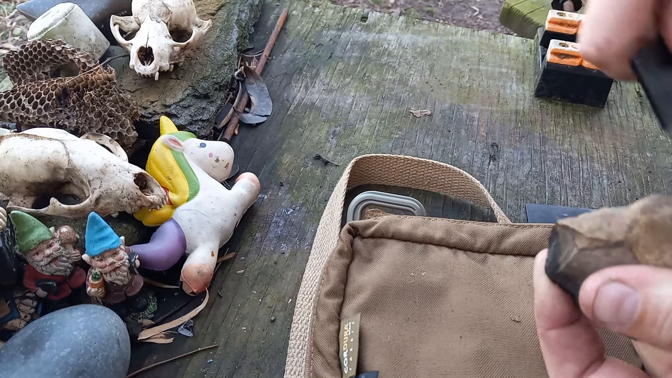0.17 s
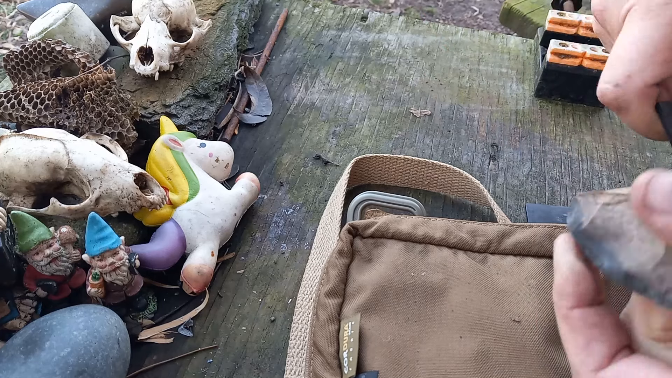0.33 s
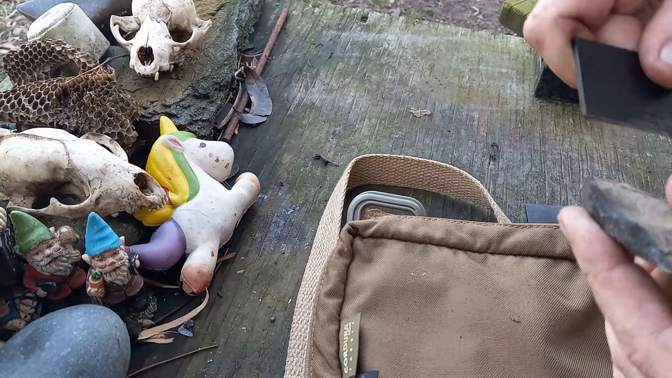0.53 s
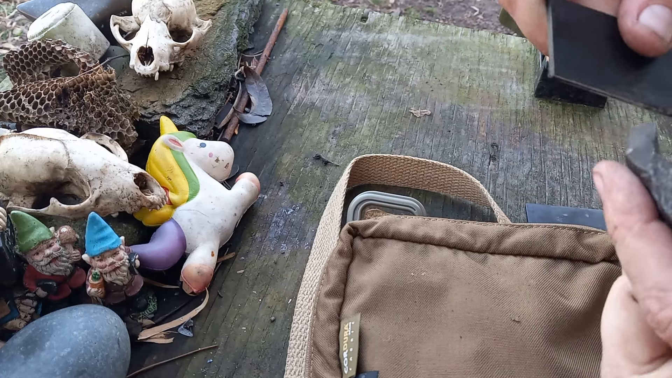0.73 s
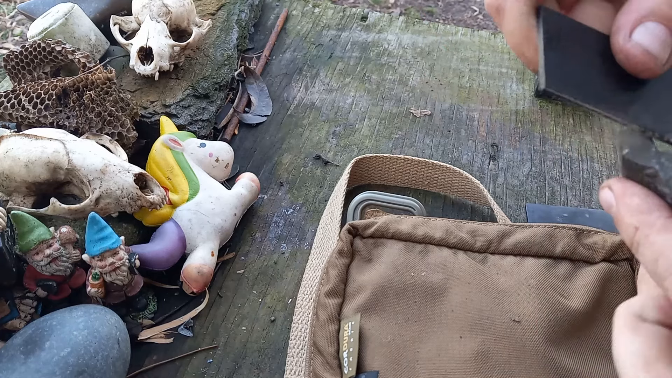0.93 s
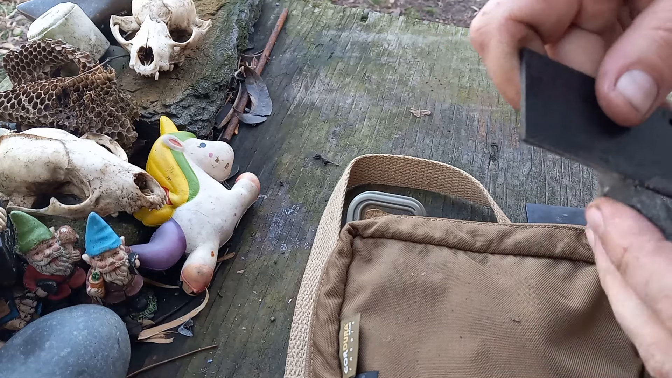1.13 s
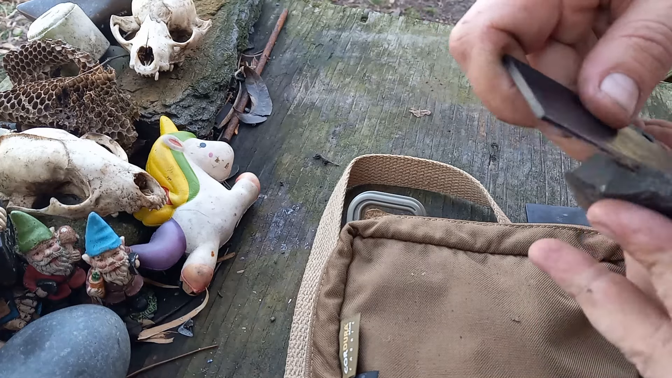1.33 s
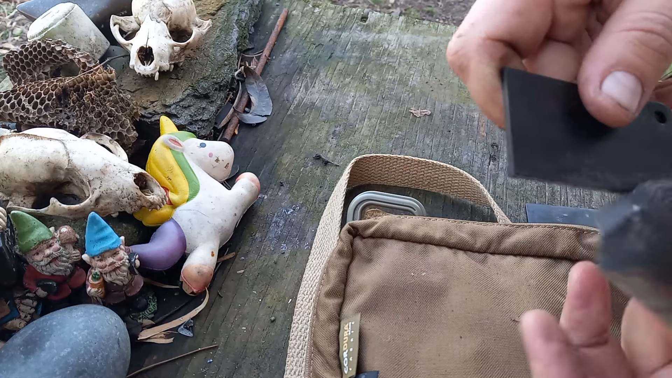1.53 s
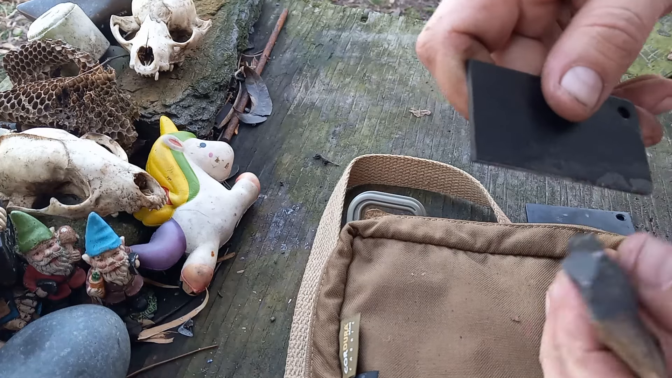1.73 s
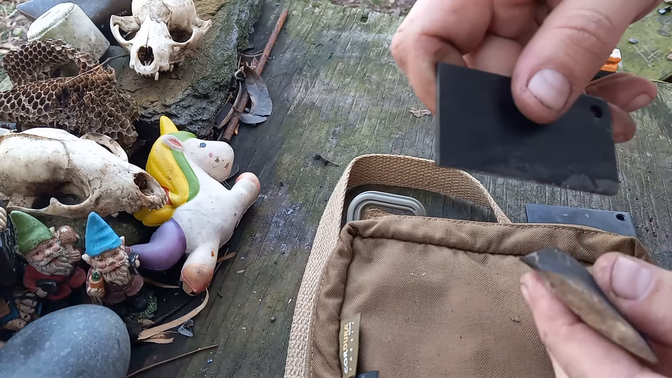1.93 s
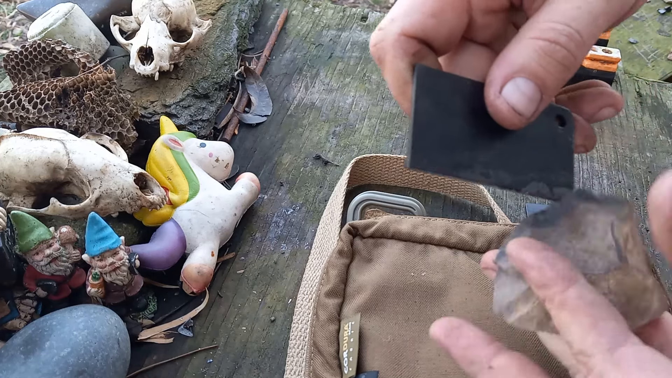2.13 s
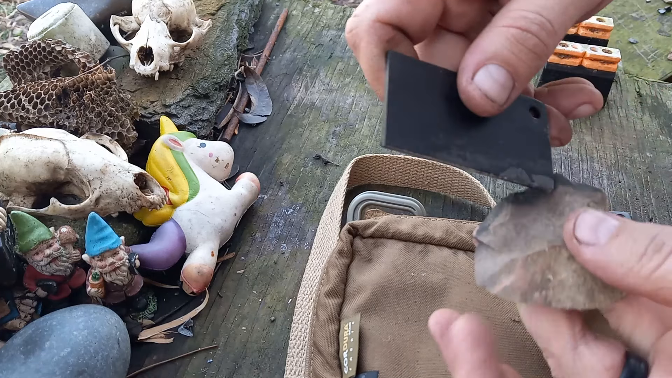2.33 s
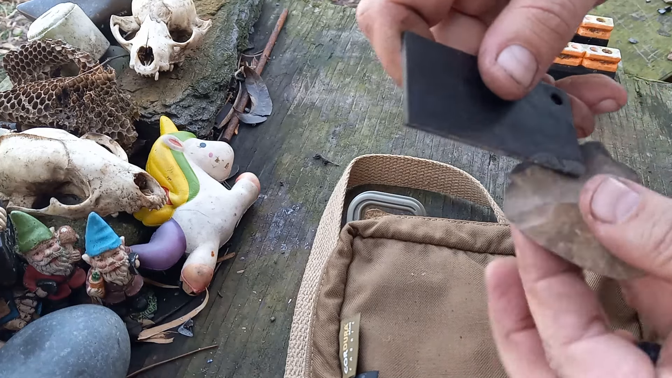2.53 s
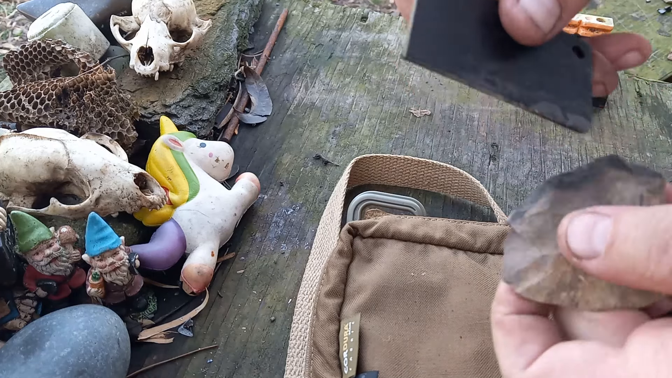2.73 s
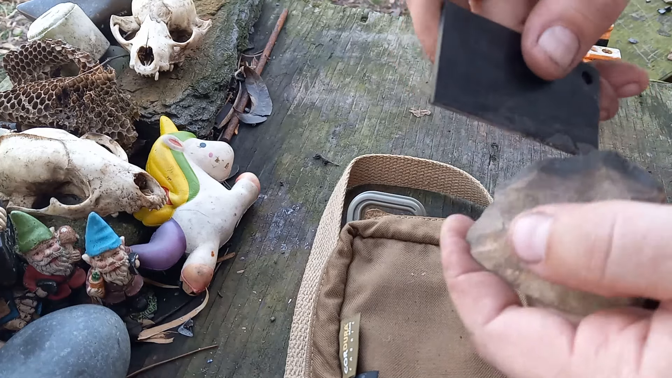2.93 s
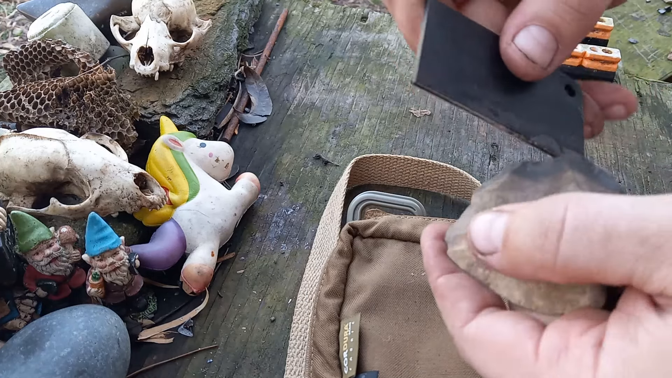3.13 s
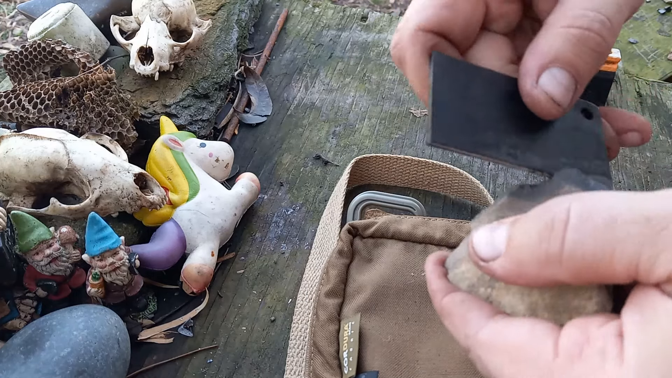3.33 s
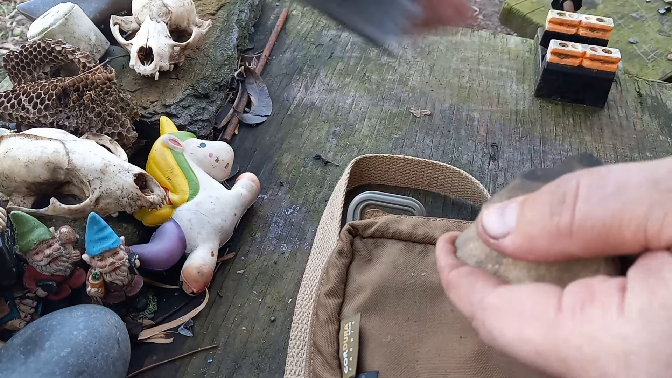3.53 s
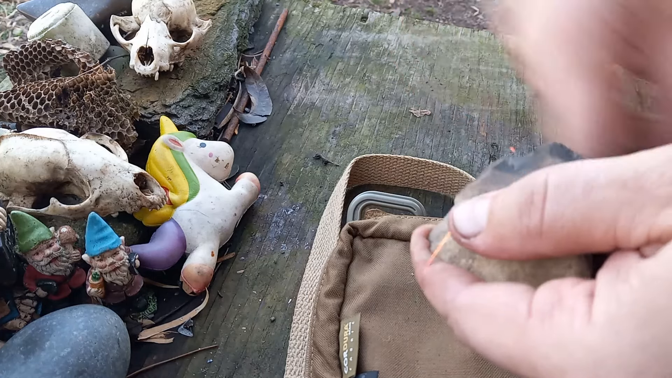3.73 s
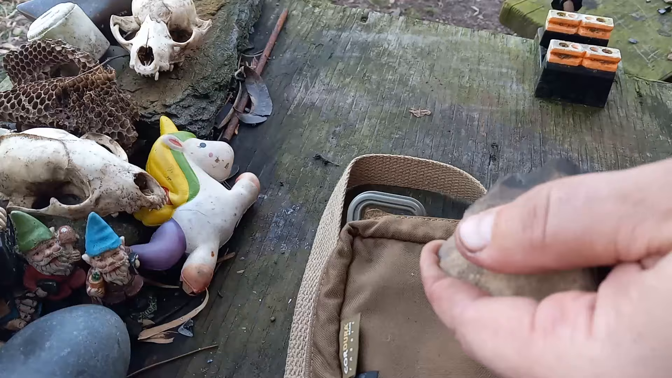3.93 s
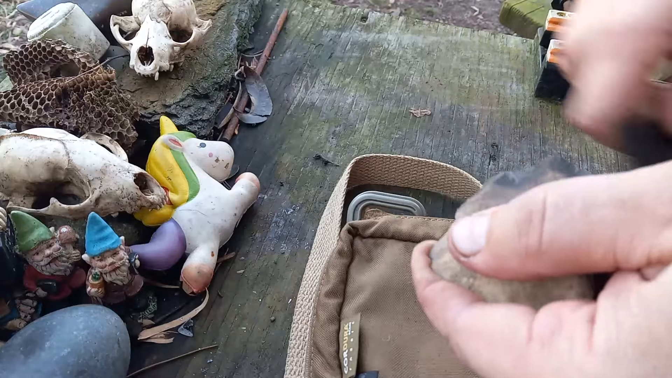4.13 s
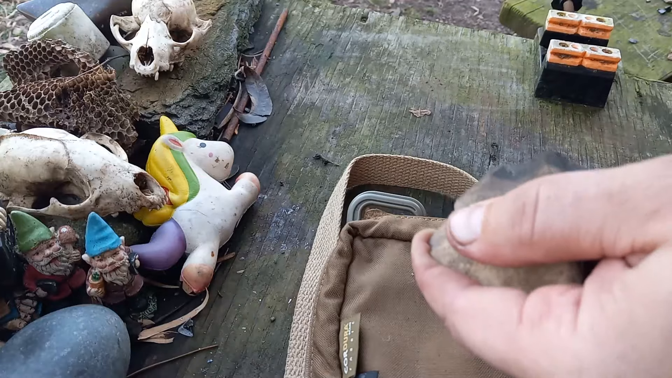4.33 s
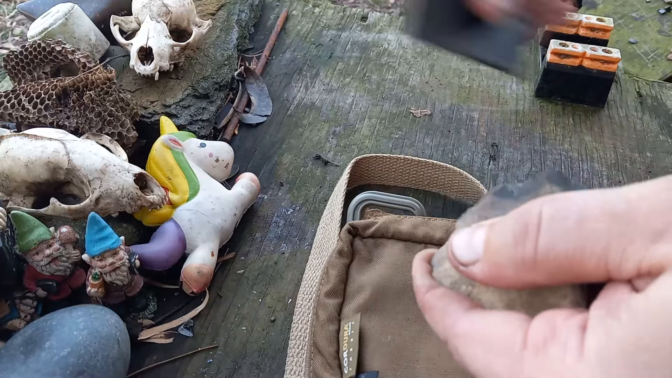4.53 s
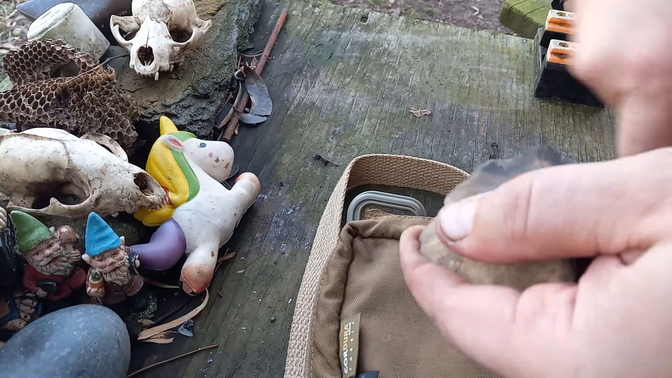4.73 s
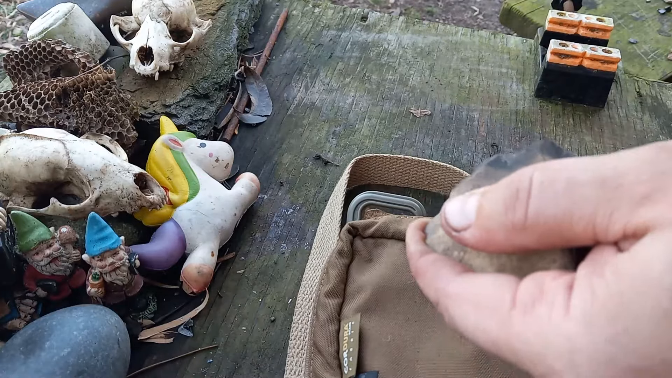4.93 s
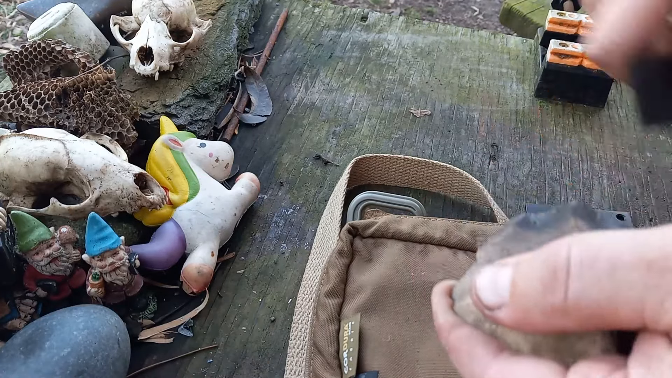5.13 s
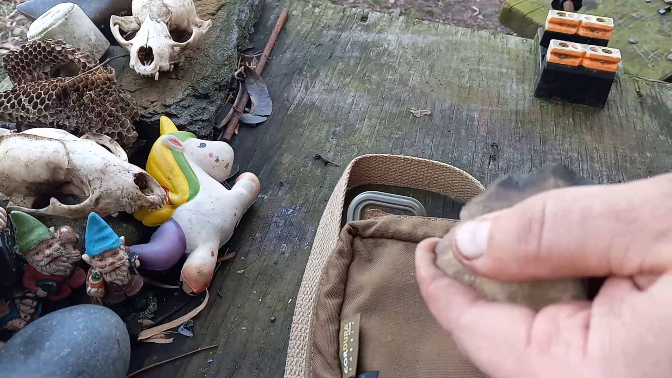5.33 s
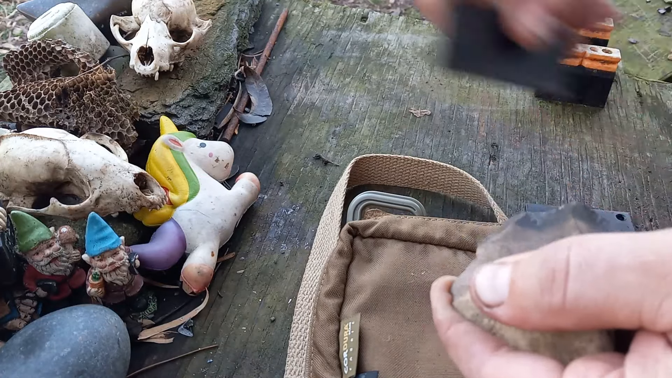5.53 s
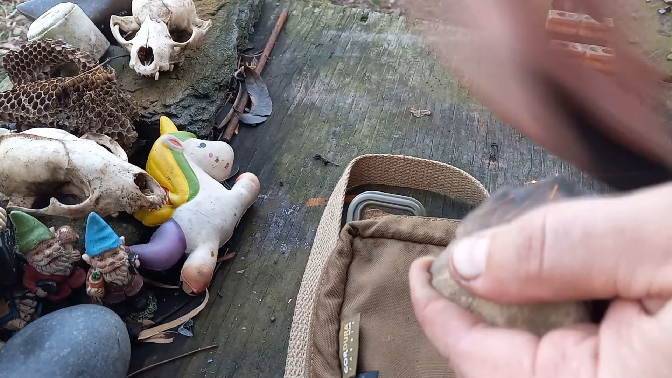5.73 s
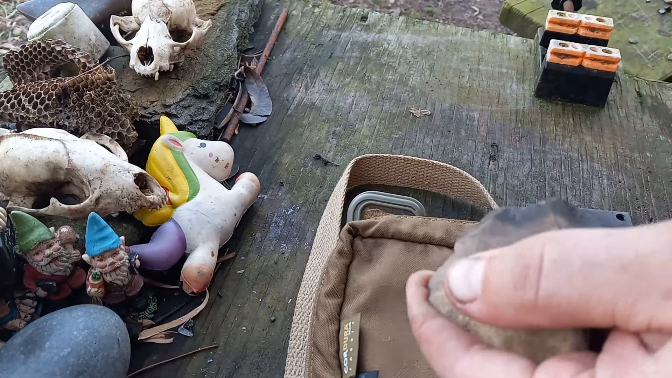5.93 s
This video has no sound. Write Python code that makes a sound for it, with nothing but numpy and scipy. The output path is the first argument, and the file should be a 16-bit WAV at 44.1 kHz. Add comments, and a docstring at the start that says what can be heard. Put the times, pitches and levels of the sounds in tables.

```python
"""A hand-held steel plate is dragged over a flint, loosely held so that it rings, then struck down on it seven
times in a firm grip. Damped plate modes and a dull stone crack answer stick-slip force. The tail of an earlier
blow opens the scene; each blow sends a jolt, a puff of air and a shower of grit. Chips tick, low knocks fall
among them, skin and sleeve rustle and rub, one faint very high squeak sounds, gusts buffet: shaped noise bands
over a faint outdoor hiss."""
import sys
import numpy as np
from scipy import signal
from scipy.fft import rfft, irfft
from scipy.io import wavfile
from scipy.ndimage import uniform_filter1d, minimum_filter1d

SR = 44100
rng = np.random.default_rng(int(sys.argv[2]) if len(sys.argv) > 2 else 0)


def master_out(mix):
    """Clip the mix to full scale and print it as 16-bit PCM to the path in sys.argv[1]."""
    frames = np.transpose(np.atleast_2d(mix))
    ceiling = np.clip(frames, -1, 1)
    pcm = np.round(ceiling * 32767).astype(np.int16)
    wavfile.write(sys.argv[1], SR, pcm)


N = 268260
T = np.arange(N) / SR


def undb(db):
    """Amplitude ratio of a level in dB."""
    return 10 ** (np.asarray(db) / 20)


def level(x, db):
    """Scale x to an RMS level."""
    return x * undb(db) / np.sqrt(np.mean(x ** 2))


def peak(x, db):
    """Scale x to a peak level."""
    return x * undb(db) / np.max(np.abs(x))


def band(x, lo_hz, hi_hz):
    """Butterworth band-pass."""
    sos = signal.butter(2, [lo_hz, min(hi_hz, SR / 2.2)], "bandpass", fs=SR, output="sos")
    return signal.sosfilt(sos, x)


def add(out, start_s, x):
    """Mix x in from start_s on, cut at both ends of the scene."""
    i = int(start_s * SR)
    x = x[max(-i, 0):N - i]
    out[max(i, 0):max(i, 0) + len(x)] += x


def coloured(points, size=N):
    """Noise of unit RMS with a spectrum given as (Hz, dB) points."""
    hz, db = np.transpose(points)
    bin_hz = np.arange(size // 2 + 1) * SR / size + 1
    gain = undb(np.interp(np.log(bin_hz), np.log(hz), db))
    return level(irfft(rfft(rng.standard_normal(size)) * gain, size), 0)


def walk(rate_hz):
    """Random levels, rate_hz new ones a second, joined by straight slopes; spread just under 1."""
    hold = int(SR / rate_hz)
    steps = np.repeat(rng.standard_normal(N // hold + 1), hold)
    return uniform_filter1d(steps, hold)[:N]


def swell(rise_s, fall_s, fade_db, shape):
    """Gain that climbs to 1 in rise_s and sinks again in fall_s (2 ms at least), fade_db down at both ends."""
    rise_s, fall_s = max(rise_s, 0.002), max(fall_s, 0.002)
    t = np.arange(-rise_s, fall_s, 1 / SR)
    return undb(-fade_db * np.where(t < 0, -t / rise_s, t / fall_s) ** shape)


def slips(size, spread_db):
    """Stick-slip force: dense clicks of very uneven size, unit RMS."""
    return level(rng.standard_normal(size) * undb(spread_db * rng.exponential(size=size)), 0)


# Plate modes. Each row: frequency in Hz, relative level in loose grip in dB, relative level in firm
# grip in dB, t60 in loose grip in seconds.
PLATE_MODES = [(1286, -27.5, -2.5, 0.1), (2170, -22.5, -10.5, 0.072), (2670, 8.5, 7.5, 0.035),
               (2960, -6, -85, 0.044), (3023, -11, 2.5, 0.021), (3560, -10.5, 0, 0.033),
               (3837, -18.5, 3, 0.03), (4070, -22.5, 15, 0.029), (5600, -19.5, -3, 0.0083),
               (5950, -25, -3, .025), (6496, -8, -1, 0.037), (7144, 6.5, 3, 0.024),
               (8444, -18, -1.5, 0.011), (9200, -7.5, -5, 0.02), (10840, -27, -9.5, 0.054),
               (11234, -8.5, -13.5, 0.042), (13500, -31.5, -6, 0.025), (15000, -17, -35, .025),
               (15650, -21, -32, .025)]
BEND_TOP_HZ = 4800  # splits low modes from high
MAIN_RING_LO_HZ, MAIN_RING_HI_HZ = 2500, 2850
SPOT_DB, SPOT_DETUNE = 2.0, 0.003  # spread between contact spots: level, frequency ratio


def rings(firm, grip, damp_db=0, crunch_hz=1250, size=3000):
    """Impulse responses of low modes, high modes and stone at one contact spot; grip scales ring time."""
    t = T[:size]
    hz, loose_db, firm_db, t60_s = np.transpose(PLATE_MODES)[:, :, None]
    # every spot shares the force a little differently among the modes and detunes them slightly
    db = (firm_db if firm else loose_db) + SPOT_DB * rng.standard_normal(hz.shape)
    db = db - damp_db * ((hz > MAIN_RING_LO_HZ) & (hz < MAIN_RING_HI_HZ))
    spot_hz = hz * (1 + SPOT_DETUNE * rng.standard_normal(hz.shape))
    decay = np.exp(-np.log(1000) * t / (t60_s * max(grip, 0.05)))
    modes = undb(db) * np.sin(2 * np.pi * spot_hz * t) * decay
    low = hz[:, 0] < BEND_TOP_HZ
    # the many small modes between the named ones merge into a broad snap
    snap = rng.standard_normal(size) * np.exp(-t / 0.00055)
    bend = band(modes[low].sum(axis=0) + undb(-21.5) * snap, 1900, 3900)
    edge = band(modes[~low].sum(axis=0) + undb(-2.0) * band(snap, 2700, 8400), 6000, 16000)
    # the stone is dead: a dull crack of a millisecond or two
    crack = rng.standard_normal(size) * np.exp(-t / 0.00042)
    crack = band(crack, crunch_hz / 1.3, crunch_hz * 1.33)
    crack = band(crack, crunch_hz / 3.4, crunch_hz * 2.1)
    return bend, edge, crack


FIRM_GRIP = 0.27  # share of ring time left when fingers clamp the plate
JOLT_LAG_S = 0.0034  # travel through arm and mount


def aftermath(jolt_db, jolt_hz, grit_db, grit_t60_s):
    """After a blow: a jolt through the mount that sinks in pitch, and a shower of fine grit."""
    t = T[:SR // 2]
    late = np.maximum(t - JOLT_LAG_S, 0)
    # starts near three times jolt_hz and settles to it
    turns = jolt_hz * (late + 0.013 * (1 - np.exp(-late / 0.0066)))
    jolt_gain = (late / 0.008) ** 2 * np.exp(-late / 0.0064)
    jolt = peak(-np.sin(2 * np.pi * turns) * jolt_gain, jolt_db)
    grains = slips(len(t), spread_db=2.5)
    on_plate = signal.fftconvolve(grains, rings(True, FIRM_GRIP)[1])[:len(t)]
    shower = level(band(grains, 2460, 6300), grit_db) + level(on_plate, grit_db - 6.5)
    return jolt + shower * np.exp(-np.log(1000) * t / grit_t60_s)


# Hard blows. Each row: start in seconds, peak levels of the low-mode, high-mode and stone responses in dB,
# stone crunch centre in Hz, skid length in seconds, skid force against the crack in dB,
# jolt peak in dB, jolt resting pitch in Hz, grit shower level in dB, shower t60 in seconds.
BLOWS = [(3.7715, -5.5, 3.5, -22, 1455, 0.0043, -26.5, -34, 61.9, -40, 0.41),
         (4.1033, -1, 8.5, -12.5, 1526, 0.0057, -36.5, -32, 62, -41.5, 0.42),
         (4.4228, -7, 3, -24, 1686, 0.0046, -29, -36, 59.8, -42, 0.49),
         (4.753, -12, 0.5, -15.5, 1520, 0.0065, -37, -30, 61.6, -43, 0.31),
         (5.0783, -11, -3.5, -18.5, 1980, 0.012, -22, -31, 60, -37.5, 0.33),
         (5.439, -5.5, -2, -24, 2406, 0.0081, -27, -36, 60.7, -43.5, 0.71),
         (5.7832, -8, -2, -12.5, 1960, 0.006, -19, -32.5, 63.4, -35.5, 0.2)]
THUD_DB, THUD_DECAY_S = -13.5, 0.001  # stone in the hand; level against the crunch


def striking():
    """Firm blows: an impulse plus a short stick-slip skid excite plate and stone, then the aftermath."""
    out, t = np.zeros(N), T[:2000]
    # a blow just before the start still dies away
    add(out, 0, aftermath(jolt_db=-35.5, jolt_hz=68, grit_db=-43, grit_t60_s=0.24))
    for start_s, low_db, high_db, crunch_db, crunch_hz, skid_s, skid_db, *after in BLOWS:
        skid_gate = 1 / (1 + np.exp(np.clip((t - skid_s) / 0.001, -40, 40)))
        force = slips(len(t), spread_db=3.0) * undb(skid_db) * np.exp(-t / 0.06) * skid_gate
        force[0] = 1  # the crack
        responses = rings(True, FIRM_GRIP, crunch_hz=crunch_hz)
        for ring, db in zip(responses, (low_db, high_db, crunch_db)):
            add(out, start_s, signal.fftconvolve(force, peak(ring, db)))
        thud = band(rng.standard_normal(len(t)) * np.exp(-t / THUD_DECAY_S), 250, 1300)
        add(out, start_s, signal.fftconvolve(force, peak(thud, crunch_db + THUD_DB)))
        add(out, start_s, aftermath(*after))
    return out


# Hands and sleeve. Each row: time in seconds, skin level in dB, sleeve level in dB.
RUSTLE_LEVELS = [(0.0, -69, -55.5), (0.41, -64.5, -125), (0.8, -65.5, -73.5), (1.27, -58.5, -64),
                 (1.5, -56.5, -68), (1.681, -53, -59.5), (1.83, -69.5, -83.5), (2.08, -61.5, -65.5),
                 (2.301, -59, -63), (2.609, -57, -65), (3.1, -62, -63.5), (3.7, -61.5, -62),
                 (4.1, -67, -67.5), (4.699, -66.5, -63.5), (5.28, -62, -66), (5.7, -69.5, -63),
                 (5.881, -54, -60), (6.08, -56.5, -64.5)]
# Skin hiss spectrum. Each row: frequency in Hz, relative density in dB per Hz.
SKIN_SPECTRUM = [(180, -39.5), (300, -11), (462, -22.5), (713, -6.5), (2210, -8), (2700, -2.5),
                 (5160, -5.5), (7080, -4.5), (16000, -16.5)]


def rustle():
    """Skin on stone hisses in grains; the sleeve swishes lower."""
    time_s, skin_db, sleeve_db = np.transpose(RUSTLE_LEVELS)
    skin = band(coloured(SKIN_SPECTRUM), 1500, 18000) * undb(2.7 * walk(120) + 0.56 * walk(32))
    sleeve = band(rng.standard_normal(N), 500, 1700) * undb(1.8 * walk(39))
    skin = level(skin, 0) * undb(np.interp(T, time_s, skin_db))
    sleeve = level(sleeve, 0) * undb(np.interp(T, time_s, sleeve_db))
    return skin + sleeve


# Gusts of air and cloth at the microphone as the arm moves. Each row: top in seconds, rise in seconds,
# fall in seconds, level at the top before the lumps in dB, centre in Hz.
ARM_GUSTS = [(0.005, 0.024, .1, -45.5, 114), (1.474, 0.06, 0.023, -65, 285), (1.55, 0.05, 0.085, -43, 333),
             (1.572, 0.043, .06, -62, 110), (1.715, .015, .04, -64.5, 110.7),
             (2.811, 0.055, 0.073, -59.5, 240), (2.975, 0.11, 0.046, -47, 239),
             (3.05, 0.048, 0.2, -60, 257), (3.252, 0.022, 0.044, -56, 350), (3.631, 0.12, 0.11, -55.5, 245),
             (3.861, .05, 0.067, -47.5, 158), (3.91, 0.084, 0.16, -53.5, 222),
             (4.168, 0.022, 0.035, -31.5, 188), (4.21, 0.083, 0.12, -44, 190),
             (4.484, .02, 0.068, -48.5, 249), (4.567, 0.035, 0.034, -48, 246),
             (4.599, 0.028, 0.047, -38, 148), (4.629, 0.099, 0.085, -43.5, 239),
             (4.87, 0.11, 0.06, -50.5, 182), (4.939, 0.081, .12, -41, 210.5),
             (5.262, 0.031, 0.11, -40, 185), (5.602, 0.1, 0.061, -46, 210), (5.644, 0.033, 0.068, -35, 261),
             (5.865, 0.024, 0.064, -39.5, 168), (5.954, 0.047, 0.069, -36.5, 257),
             (6.02, 0.12, 0.092, -45.5, 153)]
GUST_FADE_DB, GUST_SHAPE = 23, 0.96
GUST_WIDTH, GUST_SKIRT = 1.56, 10  # band edge to centre ratio; softer slope below the centre, ratio
GUST_SWISH_DB = -22  # cloth swish against the gust
# every blow also puffs air; puff level is set against the blow's skid force in dB
PUFF_RISE_S, PUFF_FALL_S, PUFF_DB, PUFF_HZ = 0.012, 0.05, -11, 156.5


def flutter():
    """Low lumpy buffeting: each gust is swelling noise in its own narrow band, with a faint swish."""
    out = np.zeros(N)
    puffs = []
    for start_s, _low_db, _high_db, _crunch_db, _crunch_hz, _skid_s, skid_db, *_after in BLOWS:
        puffs.append((start_s, PUFF_RISE_S, PUFF_FALL_S, skid_db + PUFF_DB, PUFF_HZ))
    lumps = undb(3.2 * walk(35))
    for top_s, rise_s, fall_s, db, hz in list(ARM_GUSTS) + puffs:
        shape = swell(rise_s, fall_s, GUST_FADE_DB, GUST_SHAPE)
        noise = band(rng.standard_normal(SR // 2), hz / GUST_SKIRT, hz * GUST_WIDTH)
        noise = band(noise, hz / GUST_WIDTH, hz * GUST_WIDTH)
        swish = band(rng.standard_normal(SR // 2), 410, 1300)
        gust = level(noise, db) + level(swish, db + GUST_SWISH_DB)
        add(out, top_s - rise_s, gust[-len(shape):] * shape)
    return out * lumps


# Outdoor hiss spectrum. Each row: frequency in Hz, relative density in dB per Hz.
AIR_SPECTRUM = [(25, -26), (50, -8.5), (90, 2.5), (250, -7), (500, -11), (1000, -9.5), (2000, -8.5),
                (5000, -22.5), (12000, -14), (16500, -9)]
AIR_DB = -66


def air():
    """Outdoor hiss: coloured noise that breathes a little."""
    return coloured(AIR_SPECTRUM) * undb(AIR_DB + 2.0 * walk(7.5))


# Chips, grit and several low knocks (about 700 Hz to 1 kHz). Each row: start in seconds, ring peak in dB, ring
# centre in Hz.
CHIPS_AND_KNOCKS = [(0.28, -48, 4500), (0.326, -42.5, 4000), (0.524, -37.5, 3170), (0.857, -39, 7500),
                    (1.384, -55, 7200), (2.043, -44, 6750), (2.135, -54, 6650), (2.142, -41, 4300),
                    (2.346, -29, 760), (3.177, -44, 915), (3.719, -38.5, 4000), (3.847, -33, 1000),
                    (3.852, -18.5, 1970), (3.876, -40, 2120), (3.892, -41, 3570), (3.913, -33, 1940),
                    (3.945, -40, 3410), (4.211, -30.5, 4660), (4.237, -37.5, 4180), (5.116, -25, 6780),
                    (5.129, -37, 7230), (5.143, -30.5, 5900), (5.327, -42.5, 3070), (5.347, -52, 856),
                    (5.398, -34.5, 5800), (5.534, -30.5, 4230), (5.554, -24.5, 2670), (5.566, -26.5, 1510),
                    (5.618, -45, 710), (5.647, -36, 730), (5.903, -32, 3530), (6.01, -39, 4170),
                    (6.054, -57, 861), (6.065, -36, 7460)]
CHIP_CLICK_DB = -4  # click against ring


def chips_and_knocks():
    """Dry ticks and low knocks: a broad click and a few cycles of ring, both decaying noise."""
    out, t = np.zeros(N), T[:600]
    for start_s, db, hz in CHIPS_AND_KNOCKS:
        click = band(rng.standard_normal(len(t)) * np.exp(-t / 0.0009), 1070, 18000)
        ring = band(rng.standard_normal(len(t)) * np.exp(-t / 0.0017), 0.65 * hz, 1.76 * hz)
        add(out, start_s, peak(ring, db) + peak(click, db + CHIP_CLICK_DB))
    return out


# Soft rubs of skin or cloth, and one faint very high squeak (14.8 to 15.6 kHz). Each row: middle in seconds,
# length between 1/e points in seconds, noise level before the bell in dB, lowest Hz, highest Hz.
RUBS_AND_SQUEAK = [(0.353, 0.048, -56.5, 2500, 11700), (0.367, 0.09, -60.5, 1880, 2600),
                   (0.683, .07, -64.5, 5560, 9600), (0.88, 0.057, -57.5, 1000, 11000),
                   (0.432, 0.037, -57, 1800, 11800), (0.803, 0.053, -58, 2520, 12000),
                   (1.823, 0.05, -50, 1500, 15000), (2.086, 0.059, -53.5, 2900, 11900),
                   (2.376, 0.034, -45.5, 14800, 15600), (2.801, 0.11, -55.5, 1010, 13400),
                   (3.501, 0.087, -46, 445, 7376), (5.989, 0.095, -67, 984, 12000)]


def rubs_and_squeak():
    """Short swells of grainy band noise under a bell-shaped gain; the narrowest, highest band squeaks."""
    out = np.zeros(N)
    grain = undb(2.0 * walk(147)[:SR // 2])  # shared by all rows
    t = T[:SR // 2] - 0.25
    for middle_s, length_s, db, lo_hz, hi_hz in RUBS_AND_SQUEAK:
        noise = rng.standard_normal(SR // 2) * grain
        bell = np.exp(-4 * (t / length_s) ** 2)
        add(out, middle_s + t[0], level(band(noise, lo_hz, hi_hz), db) * bell)
    return out


# The edge catches on the stone. Each row: start in seconds, peak levels of the low-mode, high-mode and
# stone responses in dB, share of ring time.
EDGE_CATCHES = [(0.8971, -25.5, -39.5, -38.5, 0.34), (0.9657, -33.5, -23.5, -40, 0.71),
                (0.9908, -46, -37, -45, 0.77), (1.0156, -51, -38, -53, 0.68),
                (1.0596, -23, -29.5, -39, 0.15), (1.0795, -33, -36, -54, 0.51), (1.2173, -28, -49, -54, 1),
                (1.2608, -8, -17.5, -28, 0.21), (1.4394, -34, -34, -53, 0.84),
                (1.4754, -26.5, -39, -32, 0.55), (1.5202, -25.5, -36, -33.5, 0.62),
                (1.5296, -9, -23.5, -16.5, 1), (1.5416, 2, -16, -19.5, 0.52),
                (1.5477, -15.5, -21.5, -22, 0.76), (1.5647, -17, -25, -28.5, 0.85),
                (1.583, -15, -9, -45, 0.35), (1.5944, -31, -10, -22, 0.46), (1.5984, -8.5, -26, -35, 0.6),
                (1.6585, -17, -26.5, -40.5, 0.54), (1.6606, -22, -18, -41.5, 0.45),
                (1.702, -9.5, 3, -52.5, 0.78), (1.7181, -29.5, -26, -52, 0.57),
                (2.1786, -10.5, -7.5, -42, 0.99), (2.1861, -21, -13, -50, 0.85),
                (2.2041, -24, -33, -37.5, 0.78), (2.2087, -22, -27.5, -39.5, 1),
                (2.239, -10.5, -0.5, -36, 0.89), (2.2815, -33, -65, -44, 0.59),
                (2.2934, -30, -51, -48, 0.6), (2.334, -25, -37, -48, 1), (2.348, -40, -52, -48, 0.51),
                (2.4291, -25, -28, -61, 0.72), (2.4697, -37, -47, -48, 0.48), (2.5441, -10, -14, -33.5, 1),
                (2.5528, -22, -30.5, -59, 0.56), (2.6254, -39, -32, -53.5, 0.51),
                (2.6444, -42, -26, -69, 0.78), (3.245, -22, -33, -29, 0.57)]
# The edge drags, pressure rising and easing off. Each row: top in seconds, rise in seconds,
# fall in seconds, low-mode, high-mode and stone levels at the top in dB, damping of the main ring in dB.
EDGE_RASPS = [(0.972, .005, 0.023, -53, -64, -52, 11), (1.006, 0.032, 0.02, -43, -42, -53, 14),
              (1.06, 0.0099, .03, -40, -53, -60, 23), (1.085, 0.054, 0.027, -43.5, -43.5, -53.5, 16),
              (1.16, 0.046, 0.024, -59, -52, -66, 8), (1.2, 0.015, 0.081, -38.5, -38, -45, 13),
              (1.224, 0.037, 0.052, -40.5, -52, -48.5, 9), (1.269, .004, 0.0051, -43, -56, -58, 8),
              (1.287, .04, 0.025, -43.5, -47, -55, 20), (1.444, .014, .03, -67, -52, -65, 4),
              (1.469, 0.032, .02, -51.5, -55, -57, 7), (1.518, 0.0052, .02, -28, -41, -35.5, 5),
              (1.526, 0.0087, 0.0091, -27, -35, -38.5, 3), (1.553, 0.0047, 0.022, -32.5, -35.5, -31.5, 2.5),
              (1.575, .016, 0.036, -24, -28, -33.5, 9), (1.6, 0.035, 0.014, -20, -18.5, -38, 8.5),
              (1.652, .005, .02, -33.5, -35, -50, 7.5), (1.665, 0.014, 0.025, -28, -28.5, -63, 6),
              (1.717, 0.0069, 0.023, -37.5, -30, -60.5, 8.5), (2.189, 0.0052, .04, -27.5, -21.5, -45.5, 2),
              (2.209, 0.028, 0.0085, -29, -30, -49, 3), (2.248, 0.0047, 0.0092, -30, -33, -63, 4.5),
              (2.296, 0.051, 0.0073, -50, -44.5, -58, 3.5), (2.341, 0.019, 0.038, -36.5, -37, -58, -11),
              (2.429, 0.064, 0.058, -37.5, -44, -54, -4), (2.492, 0.014, .04, -47.5, -65, -68, 0),
              (2.529, 0.042, 0.011, -43, -43.5, -63, 9), (2.554, 0.0025, 0.03, -32, -37, -50, -2),
              (2.62, 0.014, .03, -52, -52, -62, 14), (2.648, 0.048, 0.011, -43, -38, -60, 15),
              (3.248, .006, 0.035, -43.5, -44, -48.5, 5), (3.266, 0.027, 0.014, -34.5, -39.5, -43, 6.5)]
CONTACT_GRIP = 0.69  # share of ring time left while the edge lies on the stone
RASP_FADE_DB, RASP_SHAPE = 28.5, 1.38  # drop from top to either end; 1 = pointed top, more = rounder


def scraping():
    """Loosely held plate dragged over the stone: stick-slip rasps and sharp catches ring plate and stone."""
    out = np.zeros(N)
    for start_s, *dbs, grip in EDGE_CATCHES:
        # grains crumble for a few milliseconds after the bite
        force = slips(600, spread_db=0.0) * undb(-29) * np.exp(-T[:600] / 0.0041)
        force[0] = 1
        response = sum(peak(ring, db) for ring, db in zip(rings(False, grip), dbs))
        add(out, start_s, signal.fftconvolve(force, response))
    for top_s, rise_s, fall_s, *dbs, damp_db in EDGE_RASPS:
        pressure = swell(rise_s, fall_s, RASP_FADE_DB, RASP_SHAPE)
        force = pressure * slips(SR // 4, spread_db=3.5)[:len(pressure)]
        for ring, db in zip(rings(False, CONTACT_GRIP, damp_db), dbs):
            unit_ring = ring / np.sqrt(np.sum(ring ** 2))
            add(out, top_s - rise_s, undb(db) * signal.fftconvolve(force, unit_ring))
    return out


def scene():
    """All layers in one channel."""
    near = scraping() + striking() + chips_and_knocks()
    # the table top below sends a duller copy back
    table = np.pad(band(near, 370, 9000), (int(0.0013 * SR), 0))[:N]
    return (near + undb(-25) * table + rustle() + rubs_and_squeak() + flutter() + air())[None]


TOP_HZ, LIMIT = 16300, 0.97  # microphone top; limiter ceiling, full scale = 1


def record(dry):
    """The microphone drops deepest bass and top, a quick limiter holds peaks, the top is cut once more."""
    bass_cut = signal.butter(2, 40, "highpass", fs=SR, output="sos")
    top_cut = signal.ellip(10, 0.1, 80, TOP_HZ, fs=SR, output="sos")
    x = signal.sosfilt(top_cut, signal.sosfilt(bass_cut, dry))
    allowed = minimum_filter1d(np.minimum(1, LIMIT / (np.abs(x) + 1e-9)), size=61)
    x = x * uniform_filter1d(allowed, size=31)
    # forward and backward: no phase shift
    last_cut = signal.ellip(6, 0.1, 40, TOP_HZ + 400, fs=SR, output="sos")
    return signal.sosfiltfilt(last_cut, x)


dry = scene()
out = record(dry)
master_out(out)
```